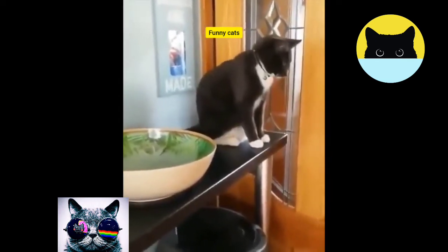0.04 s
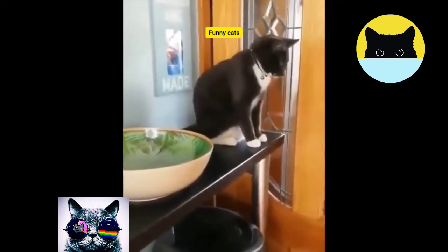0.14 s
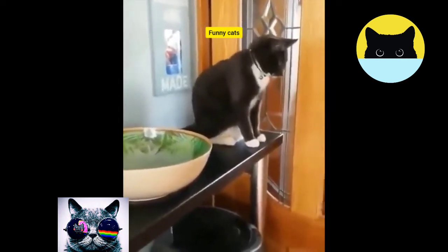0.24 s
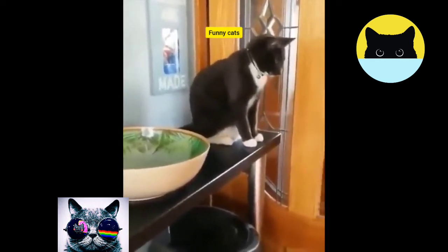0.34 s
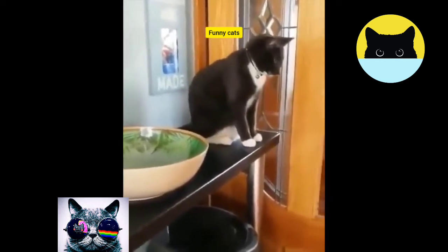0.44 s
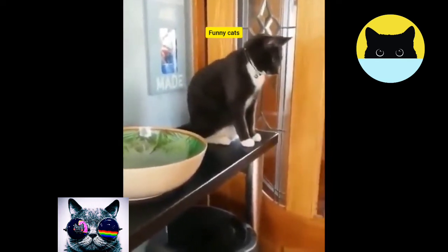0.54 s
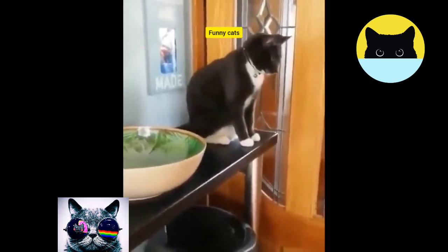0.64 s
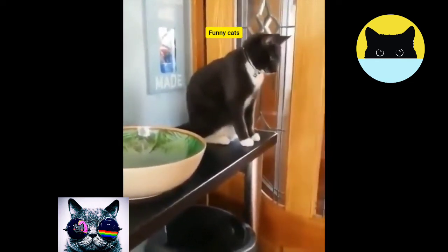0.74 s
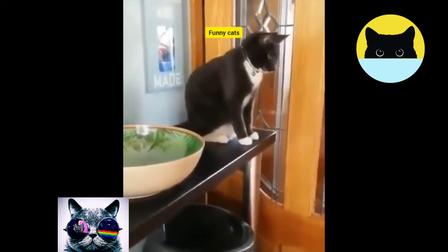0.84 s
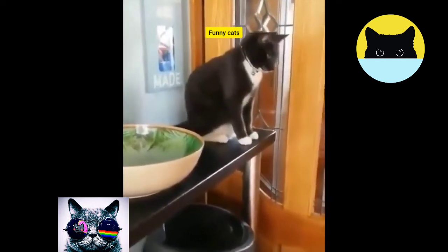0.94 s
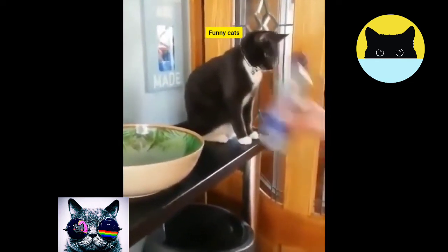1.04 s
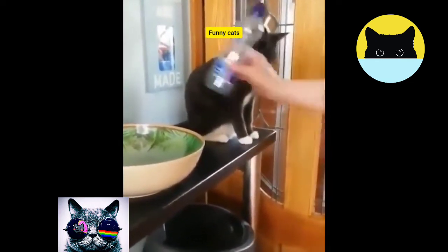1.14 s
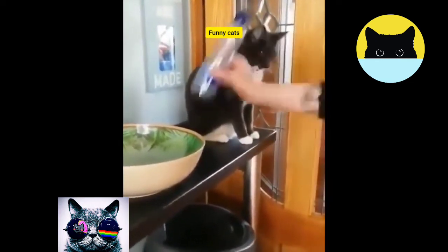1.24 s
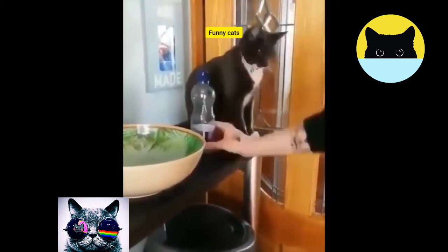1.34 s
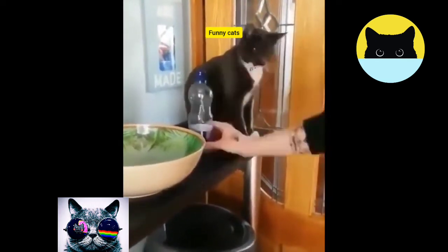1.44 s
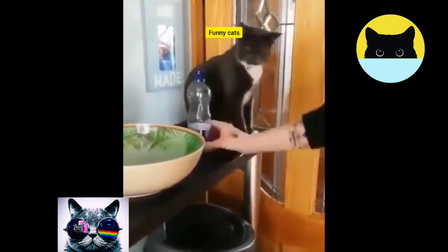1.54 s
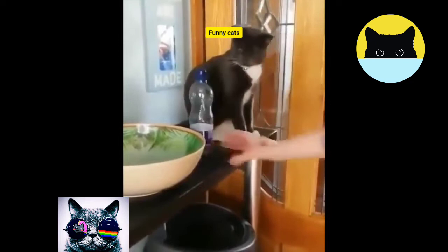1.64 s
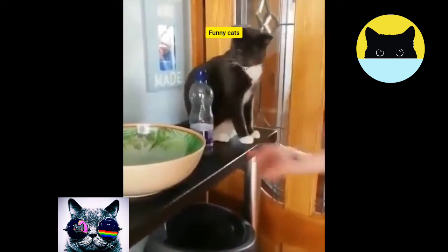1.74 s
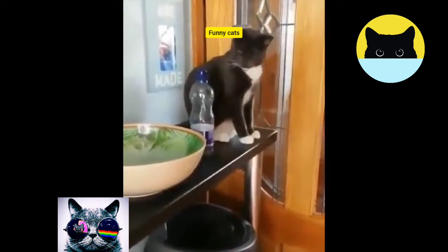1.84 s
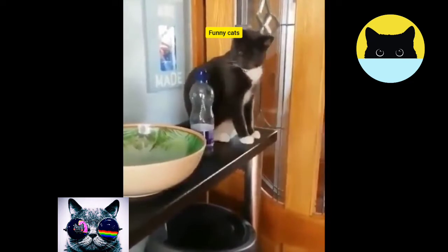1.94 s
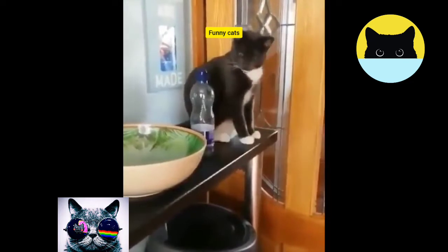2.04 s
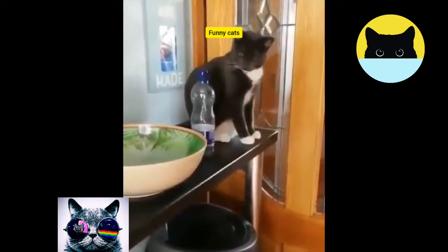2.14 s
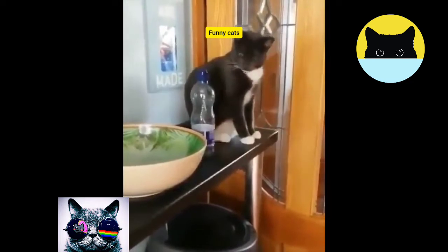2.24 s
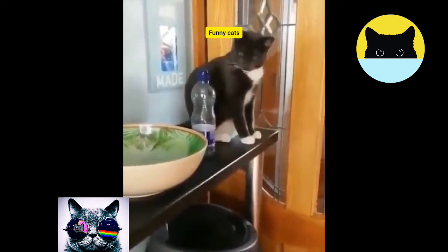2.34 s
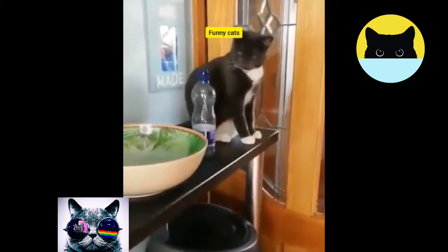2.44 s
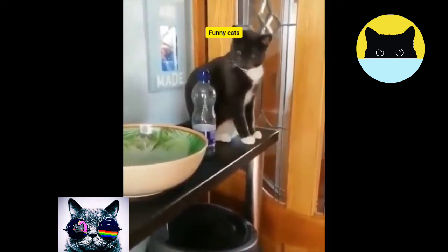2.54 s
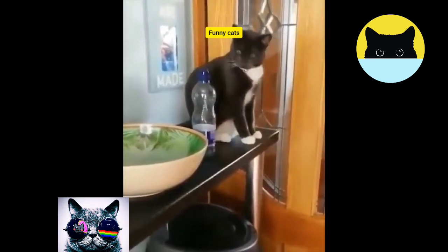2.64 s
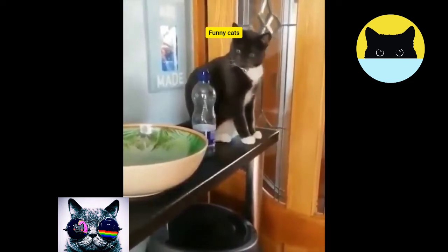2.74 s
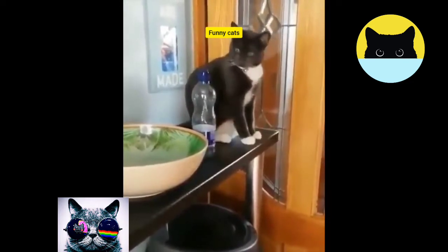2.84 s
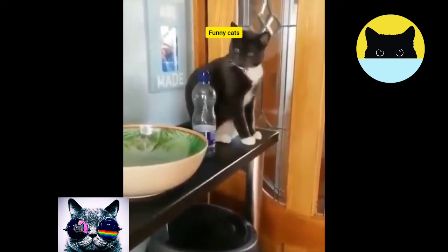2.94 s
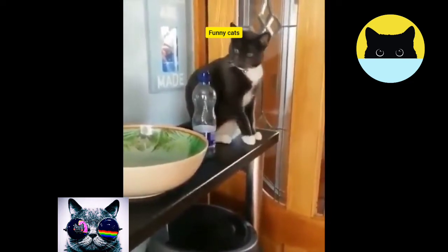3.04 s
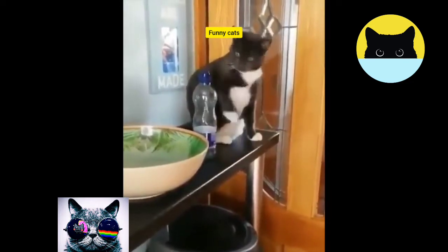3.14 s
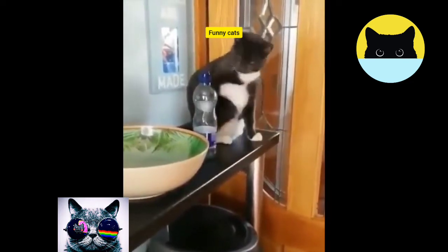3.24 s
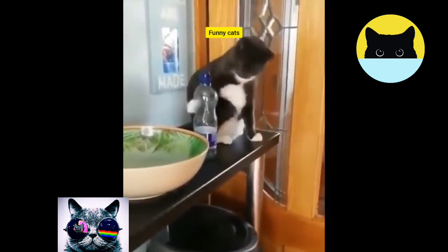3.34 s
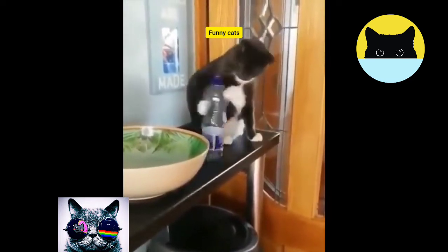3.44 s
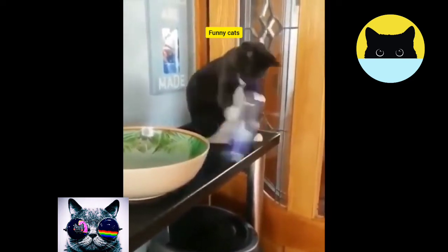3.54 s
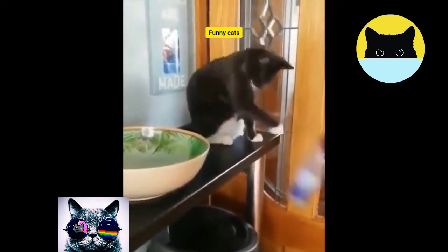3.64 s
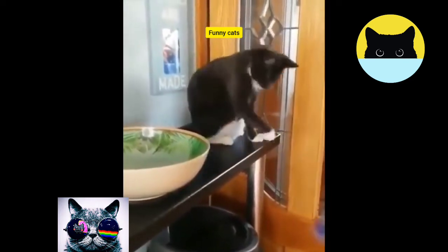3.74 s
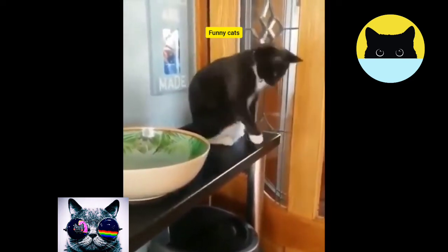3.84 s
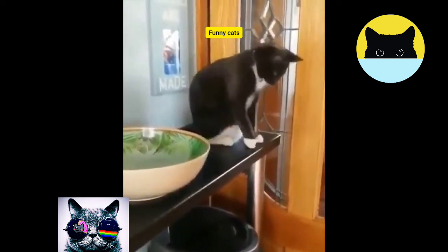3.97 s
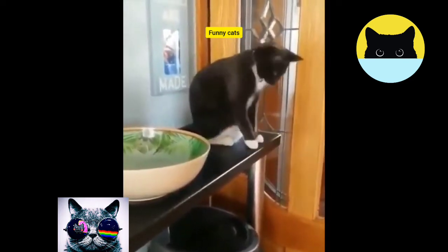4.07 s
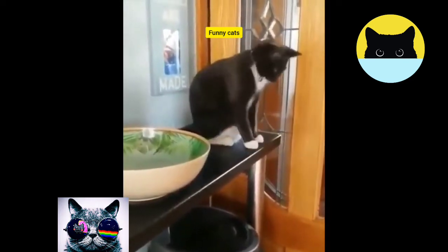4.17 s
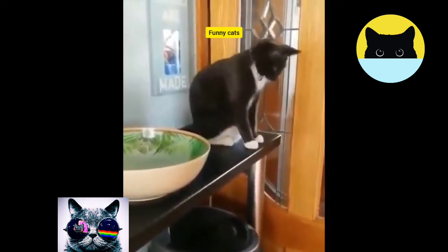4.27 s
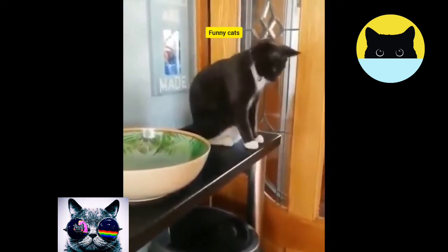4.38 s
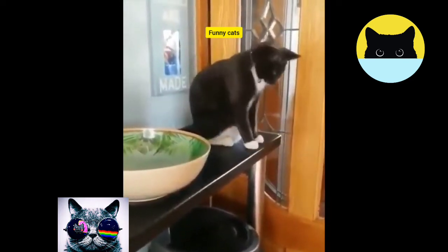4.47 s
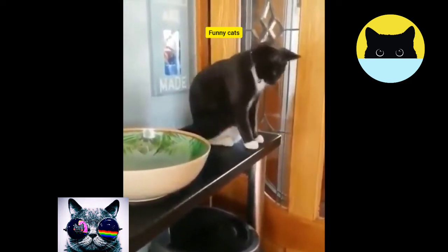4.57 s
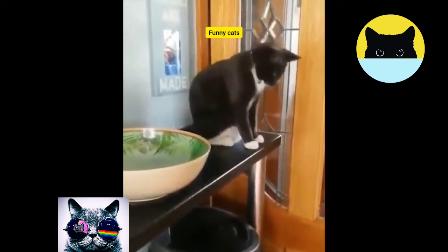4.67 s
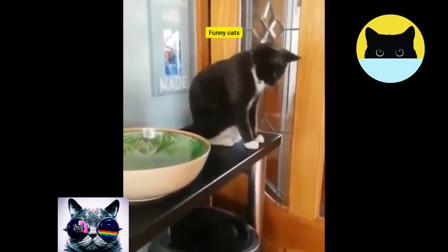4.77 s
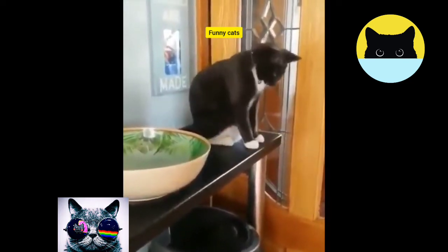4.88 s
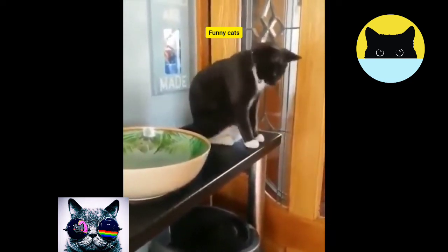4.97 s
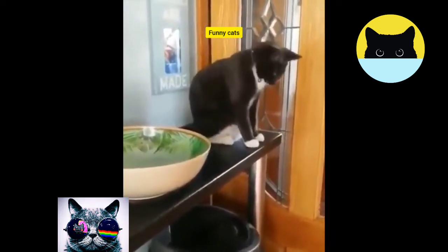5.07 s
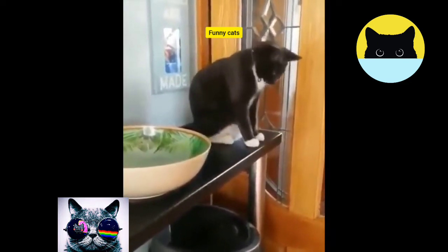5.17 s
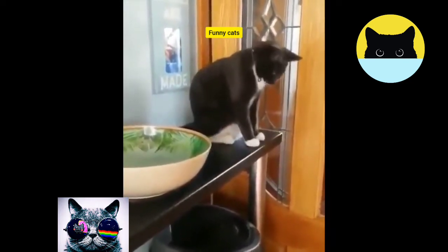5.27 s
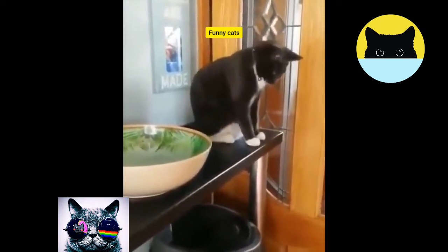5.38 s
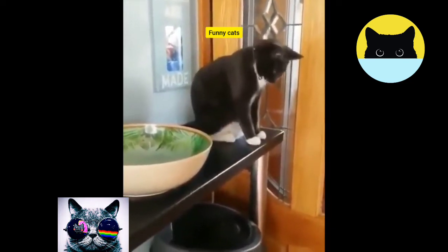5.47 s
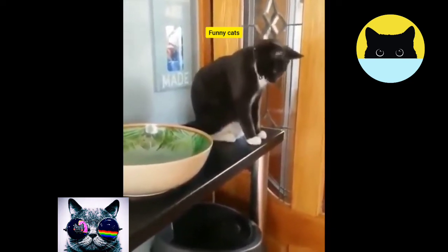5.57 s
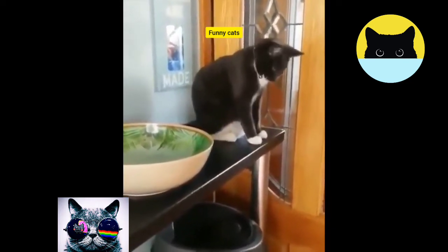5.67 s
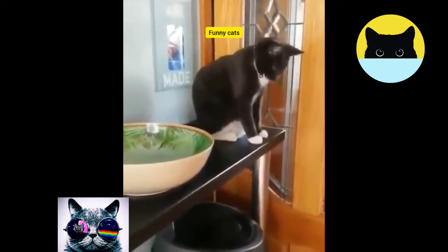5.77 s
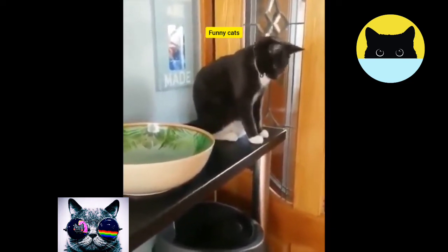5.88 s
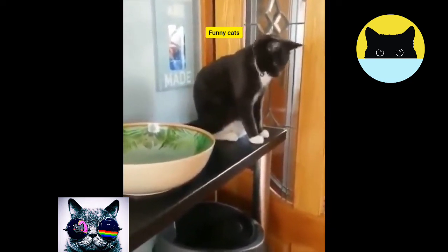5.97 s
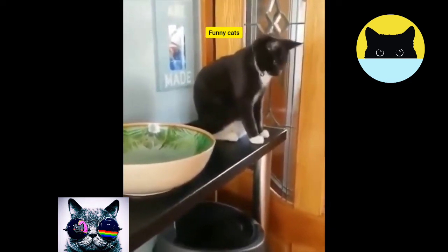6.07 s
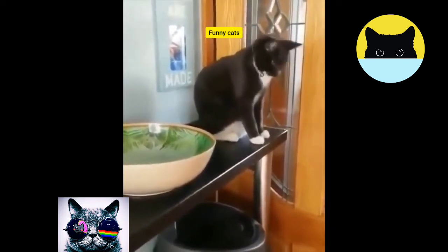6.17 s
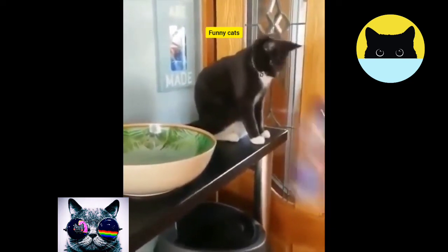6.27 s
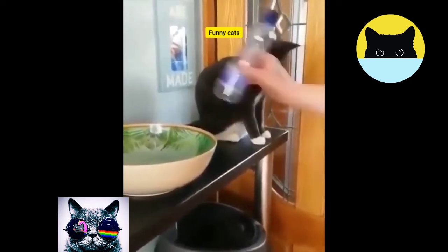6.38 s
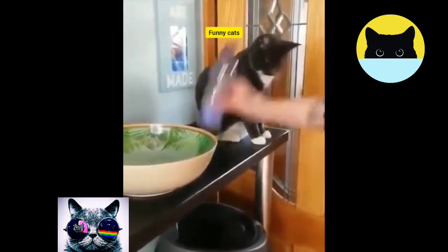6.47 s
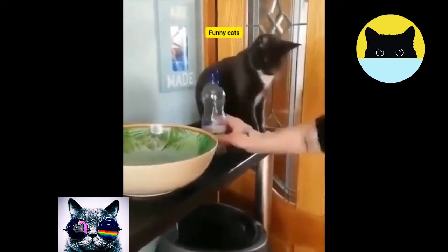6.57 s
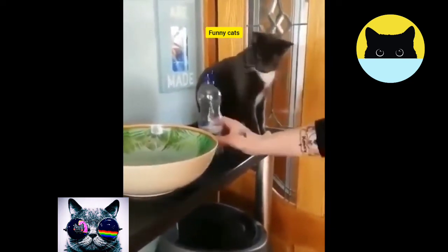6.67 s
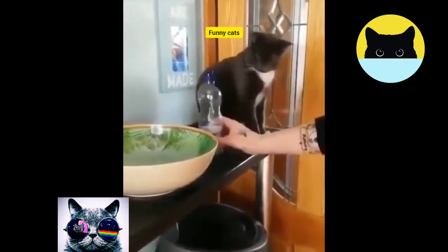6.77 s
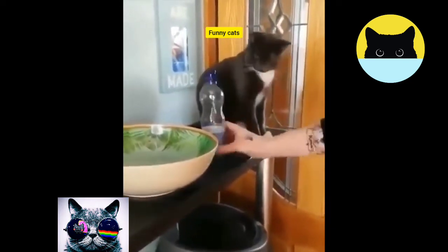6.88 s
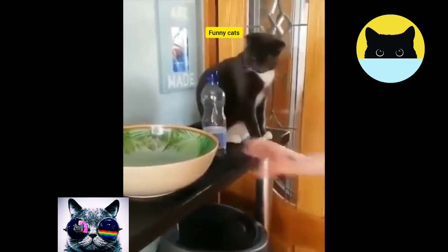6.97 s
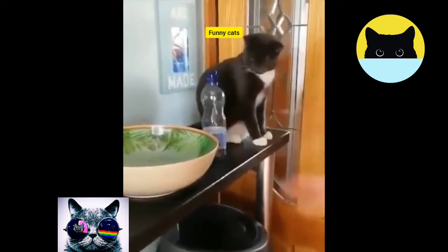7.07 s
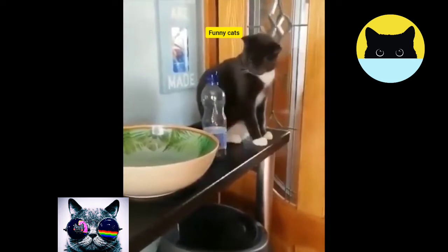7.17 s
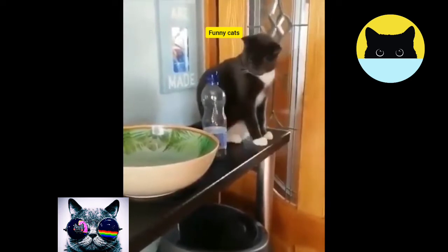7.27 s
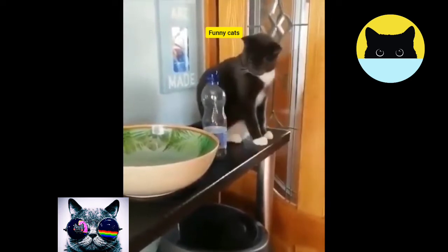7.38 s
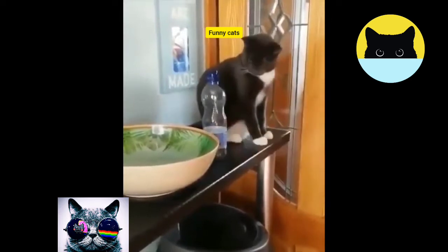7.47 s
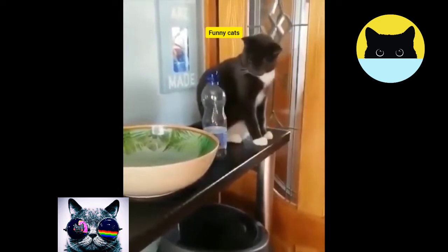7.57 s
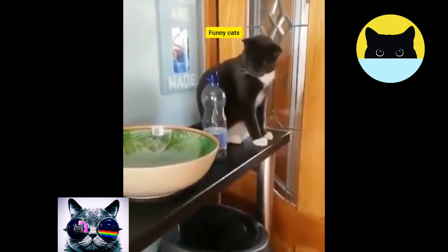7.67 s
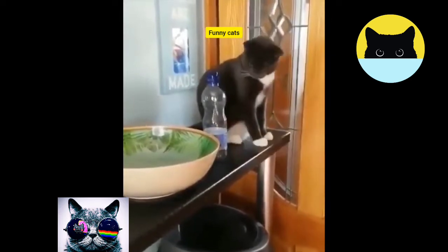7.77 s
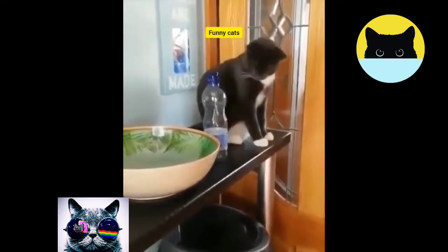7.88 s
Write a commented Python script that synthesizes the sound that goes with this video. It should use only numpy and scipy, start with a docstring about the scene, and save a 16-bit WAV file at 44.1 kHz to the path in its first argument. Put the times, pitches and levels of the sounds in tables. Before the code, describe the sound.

A plastic bottle holding a little water knocks down on a table and its thin wall pops. A cat's paw scuffs it, and it skids off with a brief squeak, then bounces and rolls on the floor. A hand picks it up and sets it down again with a knock and a few sharp pops. The small room rings slightly, over a faint hum and low hand-held microphone rumble.

```python
"""A plastic bottle with a little water in it knocks down on a table; its wall pops back as the hand lets go.
A cat paws it, and it skids off the table in a stick-slip squeak, then bounces and rolls on the floor.
A hand scuffs it, picks it up and sets it down again with another knock and a few pops.
Each blow is a burst of snaps that rings the plastic and a small, live room.
Under it all lie the low rumble of a hand-held camera, room air and a faint hum."""
import sys
import numpy as np
from scipy import signal
from scipy.fft import rfft, irfft
from scipy.io import wavfile
from scipy.ndimage import uniform_filter1d, map_coordinates

SR = 44100
rng = np.random.default_rng(int(sys.argv[2]) if len(sys.argv) > 2 else 0)


def wrap_up_sound(samples):
    """Save the sound to the file named by the first command line argument, as 16-bit audio."""
    columns = np.atleast_2d(samples).T
    # keep every value between -1 and 1, then stretch to whole-number steps
    tamed = np.clip(columns, -1, 1)
    steps = np.round(tamed * 32767).astype(np.int16)
    wavfile.write(sys.argv[1], SR, steps)


N = 349132
TIME = np.arange(N) / SR

# Cue lists of the blows. Columns: start_s, strength_db, body_db, treble_db, tail_db, rebound_gap_ms,
# rebound_loss_db, first_notch_hz, reflection_share, low_note_hz, high_note_hz, notes_db,
# favoured_hz, favoured_db, muted_hz, muted_db, snap_db
TABLE_KNOCKS = [ (1.2635, 10, 9.5, -12, -0.5, 4.27, 5, 643, 0.1, 214.5, 388, -29, 3800, 0.5, 2560, -1.5, -7),
                (1.31, 1.5, 8.5, -36, -9, 2.6, 6, 690, 0.1, 262, 435, -37.5, 1400, 4, 5230, -9, -12),
                (6.5863, 8.5, 6.5, -9.5, -2.5, 6, 4.5, 449, 0.47, 768, 959, -30, 1650, -16, 1150, -5.5, -4)]  # the base lands on the table
FLOOR_BOUNCES = [ (3.9932, 14.5, -1, -11.5, 6.5, 2.4, 4, 594, 0.27, 631, 1347, -39.5, 2850, 2, 1870, -13, -6),
                 (4.0040, 8, -12, -12.5, -6, 3.2, 4.4, 600, 0.21, 1190, 2150, -58, 2300, 8.3, 1830, -14, -13),
                 (4.0290, 7, -1, -16.5, 11, 2.8, 2.9, 544, 0.55, 663, 1310, -49, 1320, 1.6, 6460, 2, 2),
                 (4.2084, -7, 20.5, 3.5, 3.5, 6.4, 14, 643, 0.3, 523, 657, -43, 7400, 1.5, 3220, -1, -2.5),
                 (4.438, -14, 4.5, 9, 4, 2.2, 1.7, 680, 0.051, 530, 1475, -60, 4340, 3, 6260, -5, -16),
                 (4.5269, 3.5, -2.5, -9, 2, 1.6, 3, 654, 0.16, 529, 1310, -55, 3240, 3, 5760, -11, -7),
                 (4.918, 2, -25.5, -10, 3, 6.6, 7.6, 944, 0.91, 1850, 2100, -61, 1760, 9, 5260, -9, -14),
                 (5.2950, -20.5, 1, 3, 7.5, 30, 1.1, 850, 0.15, 1345, 2200, -87, 3450, 2.5, 2750, -17, -14)]  # the side hits the floor
WALL_POPS = [ (1.4596, 5, -0.87, 7.4, -2.5, 6.1, 3.1, 880, 0.055, 1670, 3420, -36, 4370, 2.4, 2810, -11, -24),
             (6.527, 0.5, 0.11, 1.6, 0.5, 4.2, 7, 990, 0.11, 1540, 3770, -64, 3720, 5.4, 1500, -5, -17),
             (6.5964, 9.5, 0, 9.6, 5.5, 7.9, 1.5, 703, 0.16, 1660, 4270, -35, 2950, 4.3, 8800, -5, -4),
             (6.8536, 13.5, 0, 4.4, 1, 3.6, 8.8, 590, 0.095, 1410, 2660, -56, 2010, 6.3, 5400, -3, 1)]  # the thin wall snaps in or out under the fingers
# Tone colour of each kind of blow: pitch_hz, gain_db
KNOCK_COLOUR = [(40, -32), (110, -10.5), (165, -1.5), (240, -1), (410, -3), (560, -11), (900, -3.5),
                (1400, -1), (2400, -3.5), (3400, 3.5), (4500, 1.5), (5200, -4), (5900, 2), (8000, 4.5),
                (9500, -21)]
BOUNCE_COLOUR = [(100, -49), (420, -14.5), (540, -1.5), (660, 1.5), (800, -11), (1050, -2), (1350, -3),
                 (1800, -2.5), (2300, -2), (3600, -3), (5500, -3.5), (7600, 1), (9500, -2)]
POP_COLOUR = [(100, -70), (500, -30), (1000, -20.5), (1550, -7.5), (1950, -17.5), (2350, -9), (2850, -8.5),
              (3500, -11.5), (5400, -11.5), (6600, -12), (8000, -7.5), (9500, -10)]
# Resonances of each struck part of the bottle: pitch_hz, width_hz, gain_db
BASE_MODES = [(401, 42, 1), (970, 37, 3.5), (1390, 140, 3), (1566, 38, 4.5), (2126, 76, 10), (3050, 110, 5),
              (3650, 120, -1.5), (3950, 90, -2), (5770, 98, 4), (6960, 130, 7), (7480, 170, -8),
              (7460, 130, 3)]
SIDE_MODES = [(1128, 25, 3), (1345, 30, 6), (1445, 30, 3), (1570, 60, 4), (2112, 25, 5), (2210, 25, 5),
              (2304, 40, 5), (2435, 50, 4), (2525, 20, 6), (3540, 130, 6), (4020, 110, 5), (4790, 230, 7),
              (5900, 160, 4), (7820, 260, 4)]
WALL_MODES = [(1570, 80, 3), (2848, 40, 4), (3564, 35, 5), (3780, 120, 4), (4128, 30, 6), (4580, 60, 4),
              (5230, 100, 3), (5830, 130, 4), (6421, 30, 5), (6717, 35, 3), (6851, 40, 5), (7008, 35, 3),
              (7280, 30, 4), (8273, 50, 3)]

# The swatted base skids over the table top: peak_s, rise_s, fall_s, level_db
SKIDS = [(3.492, 0.025, 0.011, -51.5), (3.514, 0.014, 0.015, -42.5)]
# Resonances that the skid excites: pitch_hz, width_hz, gain_db
SKID_MODES = [(920, 33, -1.5), (990, 80, -10.5), (1540, 470, -5), (2940, 160, -3), (3250, 500, -19),
              (5830, 1300, -8.5), (7470, 940, -5.5)]
# Strokes of rubbing, sliding and rolling: peak_s, rise_s, fall_s, body_db, fizz_db, hiss_db
RUBS = [ (1.968, 0.047, 0.044, -56.5, -65.5, -57.5), (3.232, 0.0035, 0.0091, -85, -56.5, -61),
        (3.29, 0.025, 0.15, -91, -72, -93), (3.44, 0.047, 0.04, -69, -68.5, -65),
        (3.512, 0.028, 0.011, -56, -53, -68), (4.404, 0.024, 0.02, -60, -63, -51.5),
        (4.661, 0.015, 0.015, -68, -57.5, -47), (4.84, 0.047, 0.037, -70, -82, -62),
        (5.17, 0.32, 0.1, -86, -71, -69.5), (6.234, 0.0018, 0.012, -75, -53.5, -66),
        (6.292, 0.027, 0.095, -68.5, -56, -61), (7.40, 0.13, 0.16, -66.5, -71, -67.5),
        (7.679, 0.02, 0.031, -72, -63, -58)]
# Middle, high and top layers of the scrape: pitch_hz, gain_db
RUB_BODY = [(290, -27), (500, 5), (717, 0), (929, 3), (1150, 4), (1410, 4.5), (1530, 3), (1790, 0.5),
            (2800, -17), (3640, -94), (6160, -120)]
RUB_FIZZ = [(1300, -66), (2100, 2), (2850, 9.5), (3600, 5.5), (4800, 4.5), (6300, -6), (8000, -28)]
RUB_HISS = [(4000, -27), (6300, -3), (7900, 4.5), (9500, -2.5)]

# Reverb time of the room: pitch_hz, t60_s
ROOM_DECAY = [(150, 0.32), (500, 0.67), (1400, 0.49), (3500, 0.41), (6500, 0.43), (9500, 0.29)]
# The hand shifts its grip on the camera: start_s, length_s, level_db
GRIP_SHIFTS = [ (0.0, 0.91, -59), (1.484, 0.69, -55), (2.856, 0.077, -56), (3.219, 0.6, -59),
               (3.367, 0.27, -55), (3.997, 0.086, -60), (6.235, 0.33, -44.5), (6.707, 0.098, -49.5),
               (6.919, 0.11, -47.5), (7.039, 0.1, -40), (7.277, 0.25, -50), (7.586, 0.18, -55.5)]
# Noise colours of the camera case and the room air: pitch_hz, gain_db
RUMBLE_COLOUR = [(65, -45), (110, -44), (138, -8), (200, 7), (279, 4.5), (303, -6.5), (324, -15.5),
                 (350, -6), (409, -24.5), (520, -18.5), (680, -49.5), (1140, -120)]
AIR_COLOUR = [(15, -47), (25, -15), (60, -4), (89, -2.5), (121, -11.5), (176, -1.5), (249, -8.5),
              (371, -4.5), (400, -8), (540, -15.5), (868, -8.5), (1470, -16.5), (5800, -26.5),
              (7830, -26.5), (9800, -37.5), (12700, -54), (21600, -120)]
# Partials of the appliance hum: pitch_hz, level_db
HUM_PARTIALS = [(70, -79.5), (99, -79.5), (188.4, -72), (297, -75), (398, -82), (894, -79.5)]


def bottle():
    """Knocks, bounces and pops: base, side and thin wall each ring with a voice of their own."""
    out = np.zeros(N)
    for cue in TABLE_KNOCKS:
        add(out, cue[0], blow(cue, KNOCK_COLOUR, BASE_MODES,
                              crack_s=0.0017, note_t60_s=0.23, body_hz=395, tail_tilt_db=-1.0))
    for cue in FLOOR_BOUNCES:
        add(out, cue[0], blow(cue, BOUNCE_COLOUR, SIDE_MODES,
                              crack_s=0.0025, note_t60_s=0.78, body_hz=684, tail_tilt_db=-4.0))
    for cue in WALL_POPS:
        add(out, cue[0], blow(cue, POP_COLOUR, WALL_MODES,
                              crack_s=0.00089, note_t60_s=0.025, body_hz=1210, tail_tilt_db=7.5))
    return out


def blow(cue, colour, modes, crack_s, note_t60_s, body_hz, tail_tilt_db, treble_hz=3600):
    """One hit in layers: a dry snap, a ringing crack with three rebounds, a tail and two wall notes."""
    strength_db, body_db, treble_db, tail_db, gap_ms, loss_db, notch_hz, reflection = cue[1:9]
    low_hz, high_hz, notes_db, favoured_hz, favoured_db, muted_hz, muted_db, snap_db = cue[9:]
    cracks, snap = np.zeros((2, SR))
    for k in range(4):
        add(cracks, k * gap_ms / 1000, amp(-k * loss_db) * buckle(crack_s))
    add(snap, 0.001, amp(snap_db) * buckle(0.0003))
    hz = abs(np.fft.fftfreq(16384, 1 / SR)) + 1
    body_bell = np.exp(-np.log(hz / body_hz) ** 2)
    treble_shelf = 1 / (1 + (treble_hz / hz) ** 4)
    tone_db = strength_db + read(colour, hz) + body_db * body_bell + treble_db * treble_shelf
    # the wall beams its treble either at the listener or away into the room
    tail_filter = causal(tail_db + tail_tilt_db * (treble_shelf - 0.5))
    tail = signal.fftconvolve(afterring(modes), tail_filter)[:SR]
    wet_cracks = cracks + np.linalg.norm(cracks + snap) * flicker(tail)
    # the struck surface mirrors the sound a moment later and cuts a row of notches
    comb = abs(1 + np.clip(reflection, 0, 0.9) * np.exp(1j * np.pi * hz / notch_hz))
    # the struck spot favours one band and mutes another, each reaching about 11% either side
    spot_db = sum(gain_db * np.exp(-(np.log(hz / centre_hz) / 0.11) ** 2)
                  for centre_hz, gain_db in ((favoured_hz, favoured_db), (muted_hz, muted_db)))
    ring = causal(tone_db + wall_response(hz, modes) + spot_db + 20 * np.log10(comb))
    # the snap is over before the wall starts to ring
    hit = signal.fftconvolve(wet_cracks, ring) + signal.fftconvolve(snap, causal(tone_db))
    notes = sloshing_notes(low_hz, high_hz, notes_db, note_t60_s)
    return hit[:SR] / np.linalg.norm(wet_cracks + snap) + notes


def buckle(crack_s, size=1024):
    """The wall buckles in a burst of tiny snaps: a crack with an even spectrum."""
    burst = rng.standard_normal(size) * np.exp(-TIME[:size] / crack_s)
    spectrum = rfft(burst, 4 * size)
    whitened = irfft(spectrum / (abs(spectrum) + 1e-9))[:size]
    return unit_energy(whitened * np.exp(-TIME[:size] / (10 * crack_s)))


def wall_response(hz, modes, spacing_hz=165, ripple_from_hz=2300, count=200):
    """Gain of the plastic in dB: strong modes, plus round humps and sharp dips new to each touch."""
    modes_db = sum(db / (1 + (2 * (hz - mode_hz) / width_hz) ** 2) for mode_hz, width_hz, db in modes)
    gaps, depths = rng.uniform(0.3, 1.7, (count, 2)).T
    zigzag = np.interp(hz, np.cumsum(gaps) * spacing_hz, depths * (-1) ** np.arange(count))
    ripple = np.minimum(zigzag, 0.33 * np.tanh(zigzag / 0.33))
    return modes_db + 7.5 * ripple * hz / np.hypot(hz, ripple_from_hz)


def sloshing_notes(low_hz, high_hz, level_db, t60_s, slosh_hz=4.95, bend_share=0.011):
    """Two fading wall notes, bent in pitch as the water rocks."""
    t = TIME[:SR]
    bent_time = np.cumsum(1 + bend_share * np.sin(2 * np.pi * (slosh_hz * t + rng.random()))) / SR
    notes = np.sin(2 * np.pi * low_hz * bent_time) + np.sin(2 * np.pi * high_hz * bent_time)
    return notes * amp(level_db - 60 * t / t60_s)


def afterring(modes, crackle_db=2.8, merge_s=0.04, shimmer_db=-3.5, singing_db=-17):
    """The tail of a crack: lumpy early echoes merge into smooth reverb while the plastic rings on."""
    lumps = unit_rms(uniform_filter1d(rng.standard_normal(SR), size=60))
    echoes = unit_energy(room() * amp(crackle_db * lumps * np.exp(-TIME[:SR] / merge_s)))
    return unit_energy(echoes + amp(shimmer_db) * shimmer() + amp(singing_db) * singing(modes))


def shimmer(t60_s=0.36, spacing_hz=120, count=80):
    """The plastic rings on in many weak modes; each blow picks its own."""
    offsets, phases = rng.random((count, 2)).T
    pitches_hz = ((np.arange(count) + offsets) * spacing_hz).astype(int)
    spectrum = np.zeros(SR // 2 + 1, complex)
    spectrum[pitches_hz] = np.exp(2j * np.pi * phases)
    return unit_energy(irfft(spectrum, SR) * amp(-60 * TIME[:SR] / t60_s))


def singing(modes, longest_t60_s=0.33, narrow_hz=35):
    """The strong modes sing on after a blow, the narrow ones longest."""
    t, ring = TIME[:SR], np.zeros(SR)
    for hz, width_hz, db in modes:
        t60_s = longest_t60_s / max(1, width_hz / narrow_hz)
        ring += amp(db - 60 * t / t60_s) * np.sin(2 * np.pi * (hz * t + rng.random()))
    return unit_energy(ring)


def flicker(x, treble_depth_db=6.5, from_hz=1800, patch_hz=260, patch_s=0.088):
    """Narrow bands swell and drop out at random, most of all in the treble; the energy is kept."""
    hz, t, bands = signal.stft(x, SR, nperseg=256)
    grid = np.meshgrid(hz / patch_hz, t / patch_s, indexing="ij")
    patches = map_coordinates(rng.uniform(-1, 1, (128, 64)), grid, order=3, mode="wrap")
    depth_db = treble_depth_db * hz / np.hypot(hz, from_hz)
    out = signal.istft(bands * amp(depth_db[:, None] * patches), SR, nperseg=256)[1][:len(x)]
    return unit_energy(out) * np.linalg.norm(x)


def skidding(grain_db=2, reverb_db=-4):
    """The base sticks and slips across the table, and the slips make the bottle sing briefly."""
    slips = rng.standard_normal(N) * amp(grain_db * drift(rate_hz=300))
    ring = sum(amp(db) * unit_rms(signal.lfilter(*signal.iirpeak(hz, hz / width_hz, SR), slips))
               for hz, width_hz, db in SKID_MODES)
    pressure = sum(amp(db) * stroke(peak_s, rise_s, fall_s) for peak_s, rise_s, fall_s, db in SKIDS)
    out = unit_rms(ring) * pressure
    return out + amp(reverb_db) * signal.fftconvolve(out, room())[:N]


def rubbing(grain_db=2.6):
    """Paw, hand and floor rub the bottle, and a sleeve rustles as the arm draws back: dense little slips make a
    broad, shifting scrape."""
    slips = flicker(rng.standard_normal(N) * amp(grain_db * drift(rate_hz=310)))
    body, fizz, hiss = tint(slips, RUB_BODY), tint(slips, RUB_FIZZ), tint(slips, RUB_HISS)
    out = np.zeros(N)
    for peak_s, rise_s, fall_s, body_db, fizz_db, hiss_db in RUBS:
        scrape = amp(body_db) * body + amp(fizz_db) * fizz + amp(hiss_db) * hiss
        out += stroke(peak_s, rise_s, fall_s) * scrape
    return out + signal.fftconvolve(out, room())[:N]


def stroke(peak_s, rise_s, fall_s):
    """Pressure of a stroke that swells to its peak and fades."""
    distance = abs(TIME - peak_s) / np.where(TIME < peak_s, rise_s, fall_s)
    return 1 / np.cosh(np.minimum(distance, 20)) ** 2


def room(build_s=0.0064):
    """The small room's reverb: a diffuse tail that builds up, then dies band by band."""
    hz, t, bands = signal.stft(rng.standard_normal(SR), SR, nperseg=256)
    decay = amp(-60 * t / read(ROOM_DECAY, hz)[:, None])
    tail = signal.istft(bands * decay, SR, nperseg=256)[1][:SR]
    return unit_energy(tail * (1 - np.exp(-(TIME[:SR] / build_s) ** 2)))


def handling(rest_db=-69.5, attack_s=0.015, release_s=0.074, sag_db_per_s=5.5, tremor_db=1.5):
    """Fingers stir a dull resonance of the camera case: faint at rest, louder as the grip slips."""
    power = np.full(N, amp(rest_db) ** 2)
    for start_s, length_s, db in GRIP_SHIFTS:
        age_s = np.maximum(TIME - start_s, 0)
        attack = np.minimum(age_s / attack_s, 1)
        release = np.exp(-np.maximum(age_s - length_s, 0) / release_s)
        power += (attack * release * amp(db - sag_db_per_s * age_s)) ** 2
    rumble = tint(rng.standard_normal(N), RUMBLE_COLOUR)
    return rumble * np.sqrt(power) * amp(-tremor_db * drift(rate_hz=15))


def room_air(level_db=-61.5, swell_db=1.0):
    """A bed of dark room noise that gently swells and sinks."""
    return tint(rng.standard_normal(N), AIR_COLOUR) * amp(level_db + swell_db * drift(rate_hz=3))


def appliance_hum(waver_rad=0.19):
    """A faint hum whose partials each waver in phase."""
    return np.sqrt(2) * sum(amp(db) * np.sin(2 * np.pi * hz * TIME + waver_rad * drift(rate_hz=6.1))
                            for hz, db in HUM_PARTIALS)


def amp(db):
    """Decibels to gain."""
    return 10 ** (np.asarray(db) / 20)


def unit_rms(x):
    """Scales to an rms of one."""
    return x / np.sqrt(np.mean(x ** 2) + 1e-20)


def unit_energy(x):
    """Scales to an energy of one."""
    return x / np.linalg.norm(x)


def read(curve, hz):
    """Reads a curve on a log-frequency axis."""
    points_hz, values = np.transpose(curve)
    return np.interp(np.log(hz + 1), np.log(points_hz), values)


def add(mix, start_s, sound):
    """Mixes a sound in at its cue."""
    part = mix[round(start_s * SR):][:len(sound)]
    part += sound[:len(part)]


def tint(x, colour):
    """Equalises a scene-long sound and scales it to an rms of one."""
    return unit_rms(irfft(rfft(x) * amp(read(colour, np.fft.rfftfreq(N, 1 / SR))), N))


def causal(gain_db):
    """Minimum-phase impulse response with a sharp attack, from gains over the full frequency circle."""
    log_spectrum = np.conj(signal.hilbert(np.log(amp(gain_db))))
    return np.fft.ifft(np.exp(log_spectrum)).real[:len(gain_db) // 2]


def drift(rate_hz):
    """Smooth random wander with an rms of one."""
    lowpass = np.exp(-(np.fft.rfftfreq(N, 1 / SR) / rate_hz) ** 2)
    return unit_rms(irfft(rfft(rng.standard_normal(N)) * lowpass, N))


def scene():
    """The mono mix, from the bottle down to the room tone."""
    return (bottle() + skidding() + rubbing() + handling() + room_air() + appliance_hum())[None]


def record(dry):
    """A steep low-pass takes the top off the mix."""
    lowpass = signal.firwin(401, cutoff=9690, window=("kaiser", 8), fs=SR)
    return signal.oaconvolve(dry, lowpass[None], "same")


dry = scene()
out = record(dry)
wrap_up_sound(out)
```